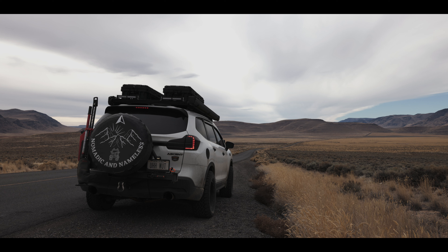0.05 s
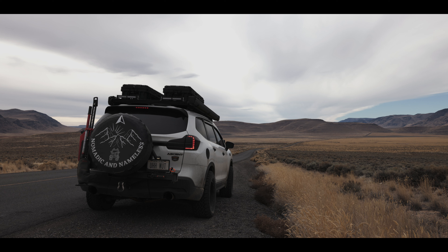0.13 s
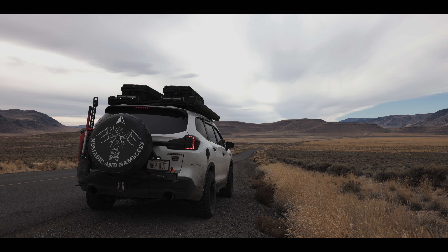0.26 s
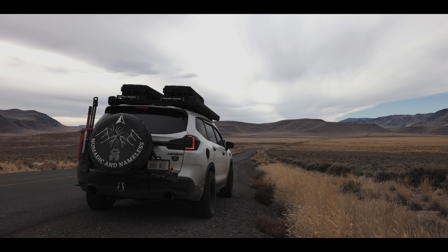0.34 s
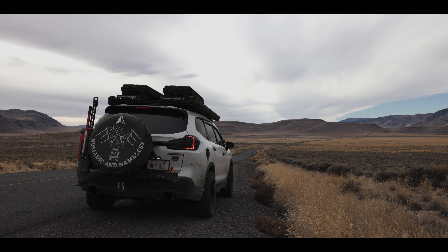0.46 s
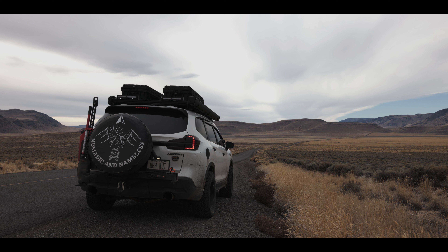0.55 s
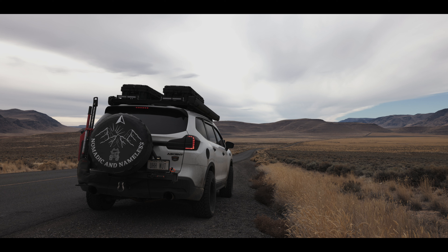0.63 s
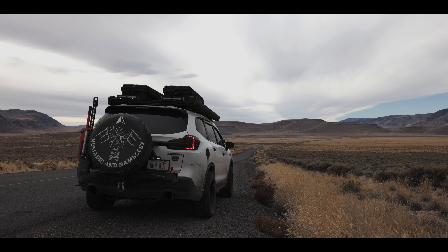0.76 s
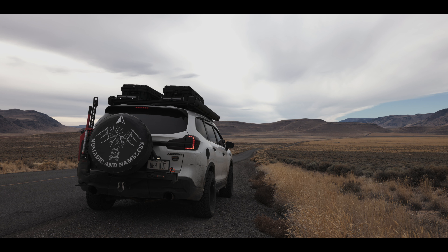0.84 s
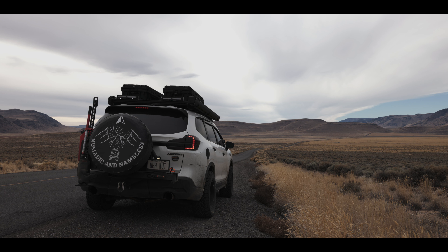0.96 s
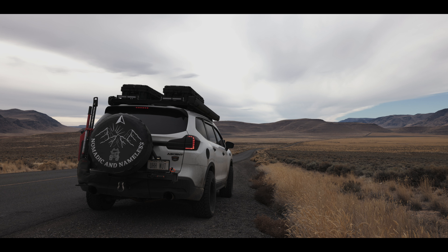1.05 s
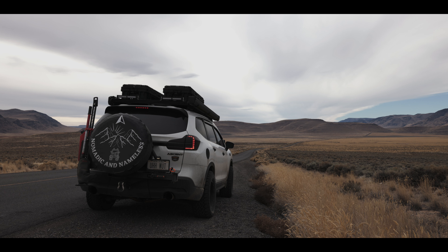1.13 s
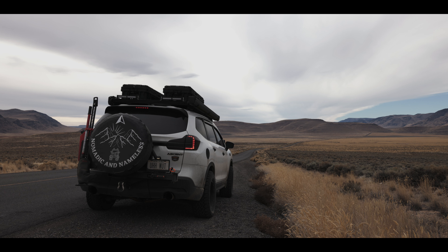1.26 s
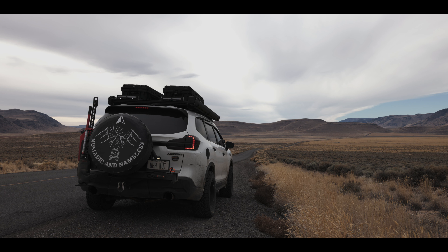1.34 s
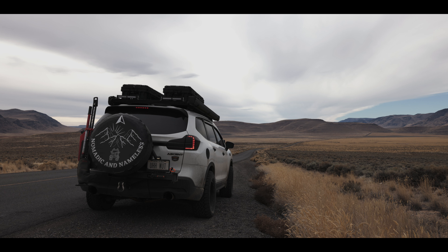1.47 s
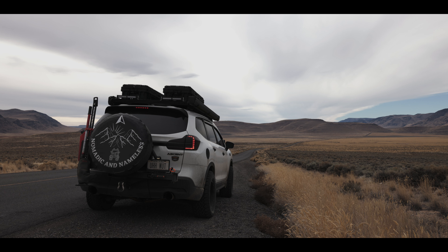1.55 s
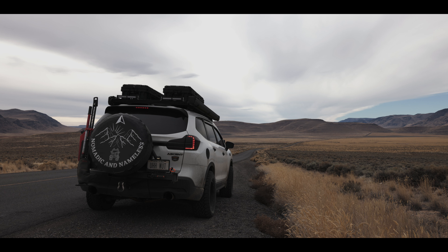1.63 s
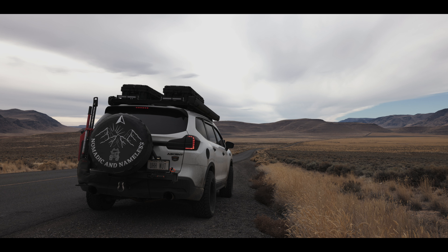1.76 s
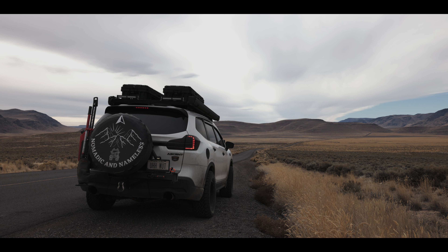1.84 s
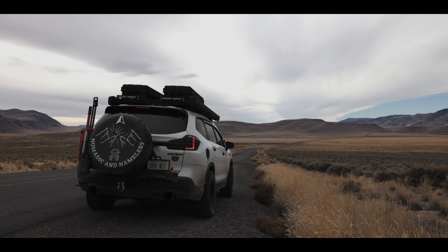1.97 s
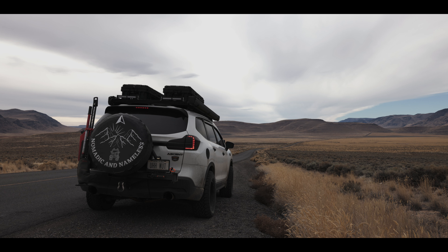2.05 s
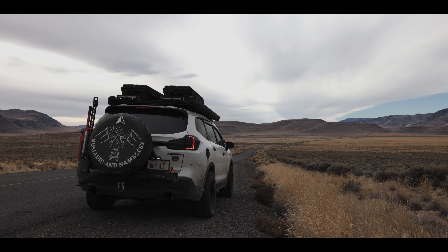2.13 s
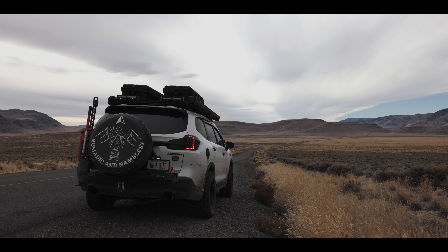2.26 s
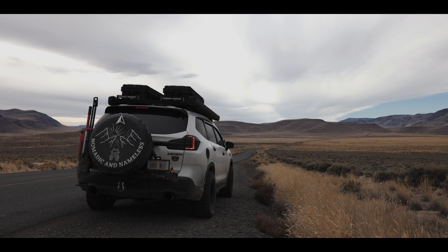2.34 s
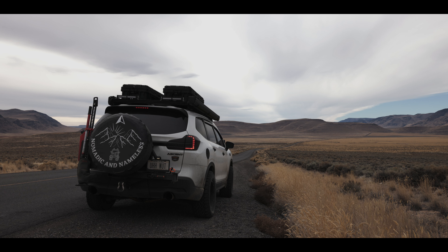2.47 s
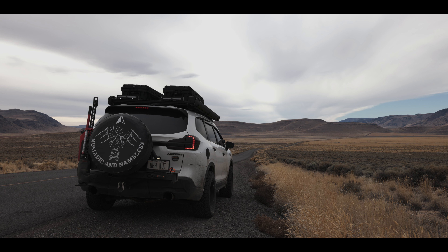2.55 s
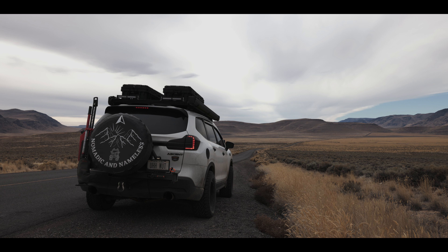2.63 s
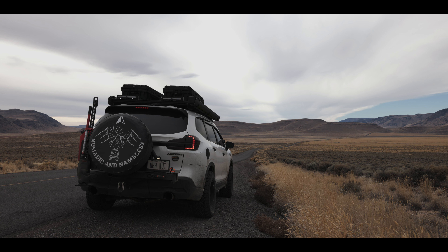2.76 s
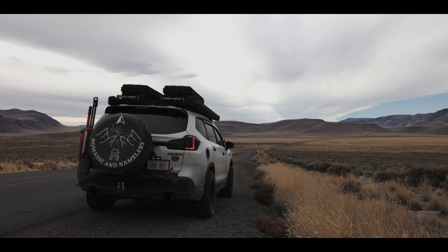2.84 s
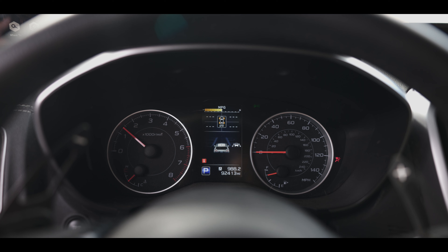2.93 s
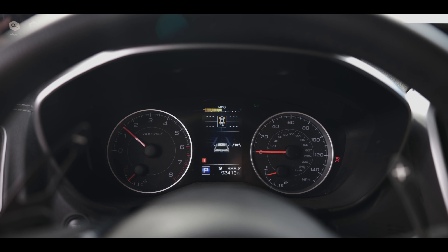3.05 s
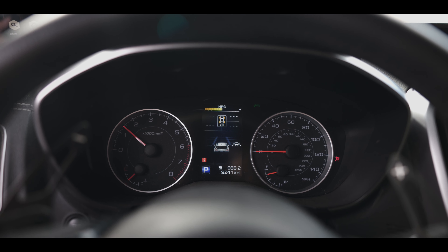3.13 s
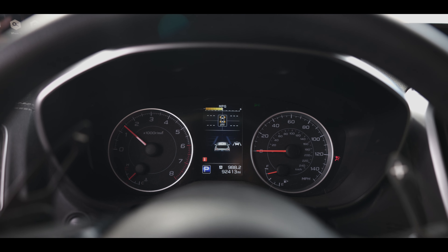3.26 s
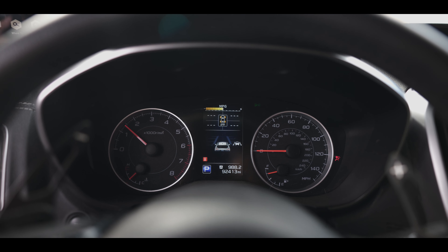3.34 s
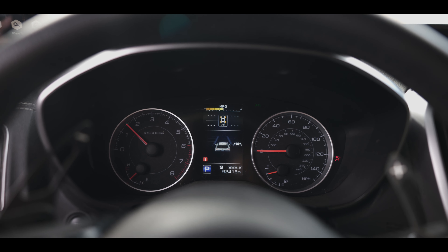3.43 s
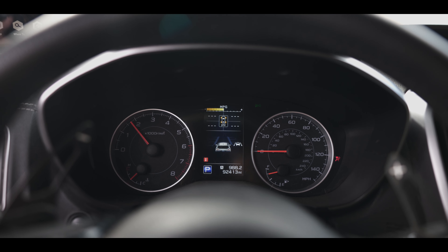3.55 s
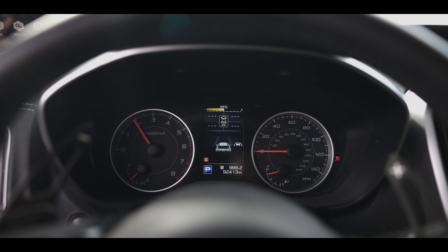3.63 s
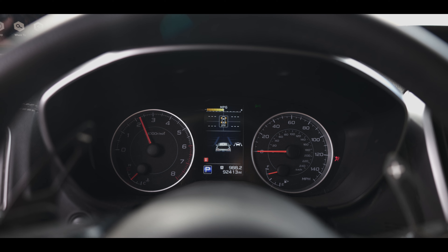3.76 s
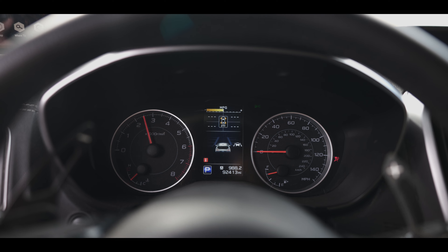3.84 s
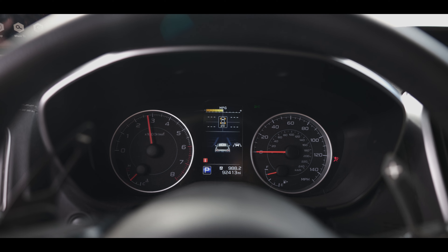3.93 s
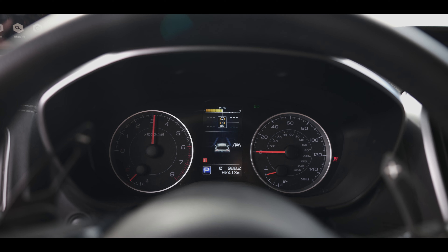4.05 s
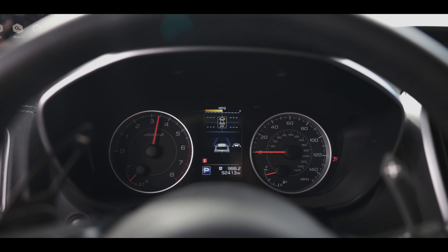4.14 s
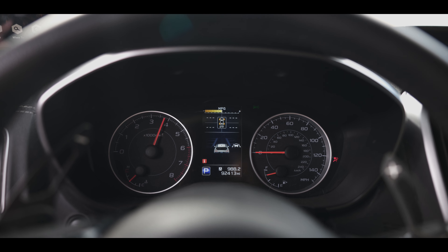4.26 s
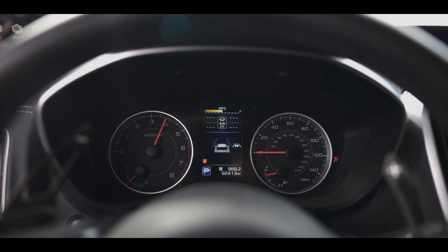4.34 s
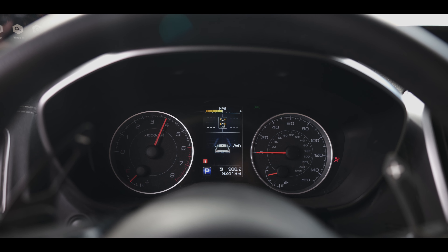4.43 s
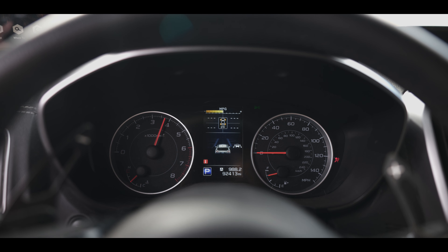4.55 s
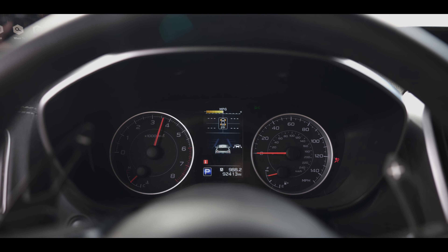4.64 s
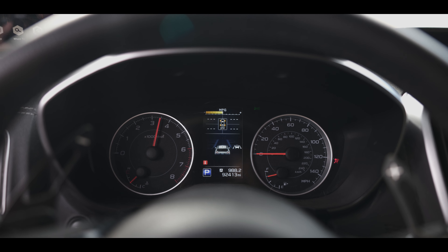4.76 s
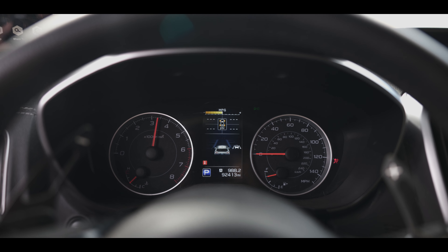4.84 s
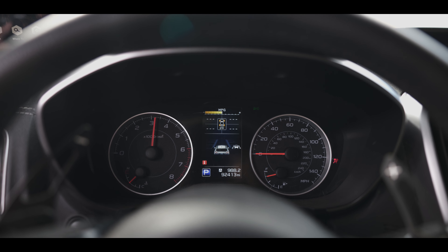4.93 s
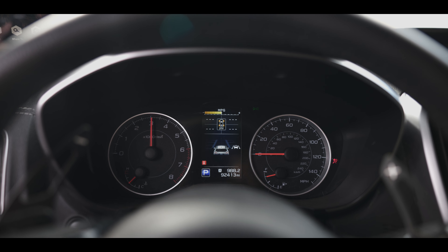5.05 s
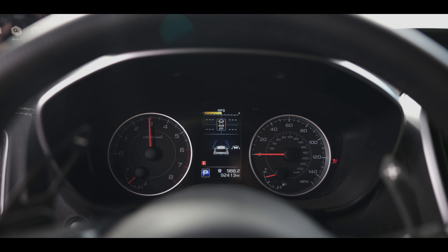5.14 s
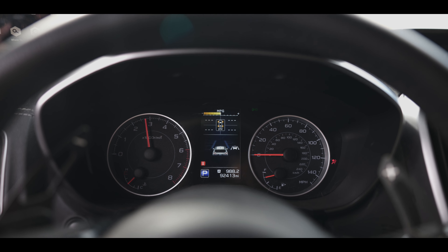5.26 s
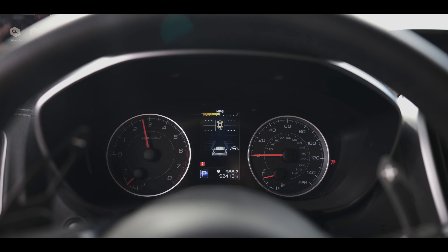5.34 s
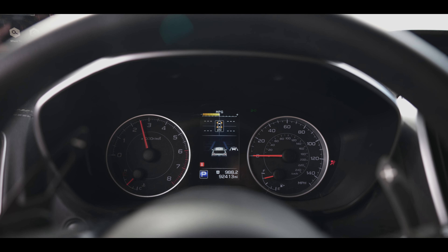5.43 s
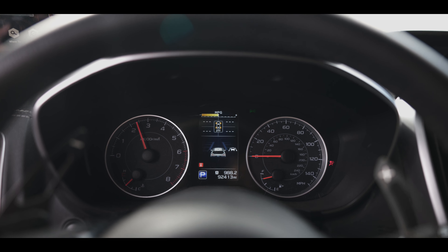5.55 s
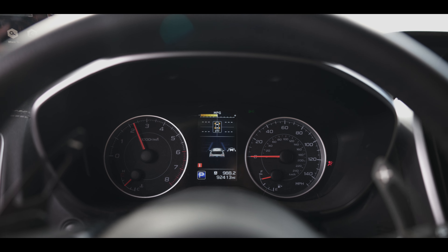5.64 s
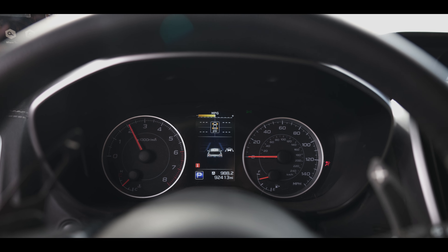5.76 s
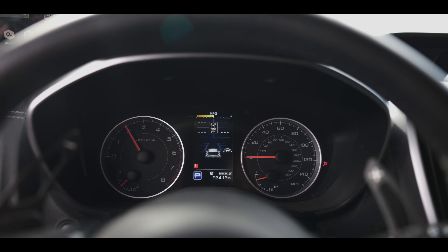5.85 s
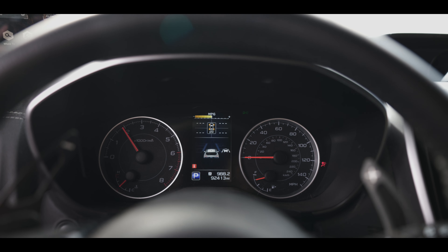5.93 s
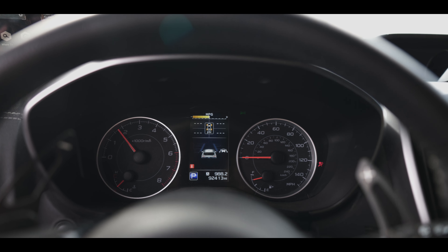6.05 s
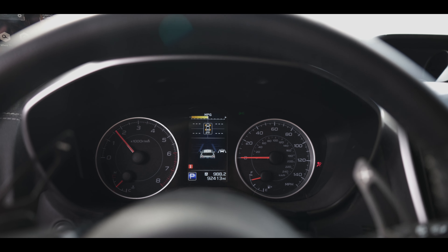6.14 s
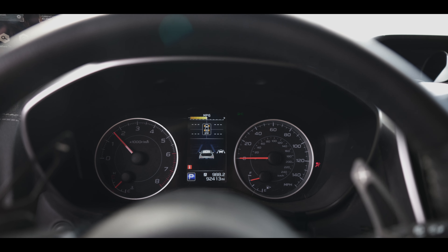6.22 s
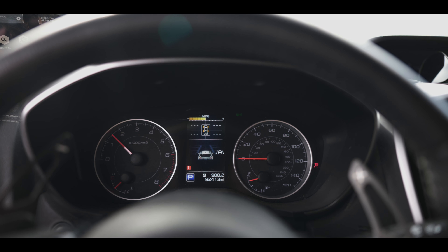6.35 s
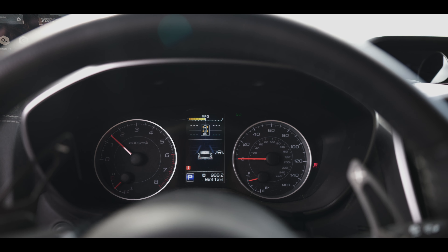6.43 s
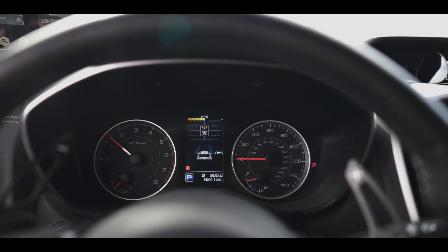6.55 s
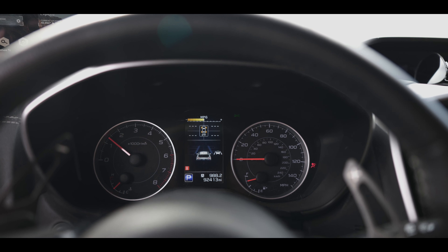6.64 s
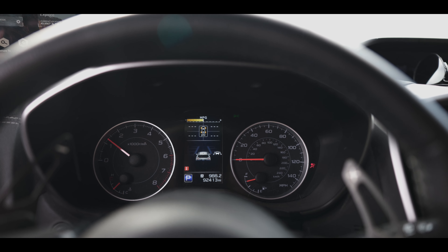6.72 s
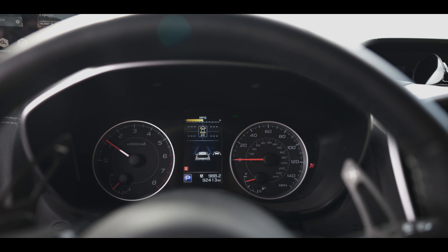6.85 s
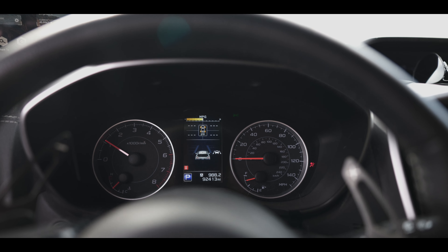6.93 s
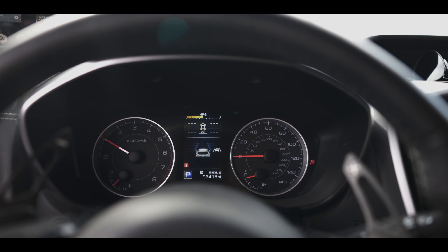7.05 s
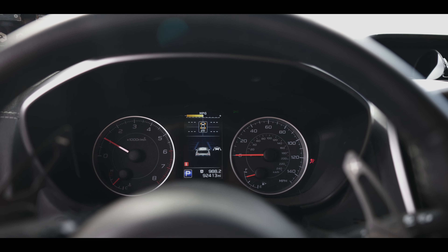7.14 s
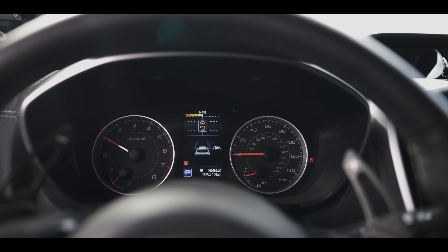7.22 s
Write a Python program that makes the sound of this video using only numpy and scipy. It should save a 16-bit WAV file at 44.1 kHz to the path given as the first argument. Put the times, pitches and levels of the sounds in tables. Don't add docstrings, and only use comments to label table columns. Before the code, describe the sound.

Close tailpipe burble of a four-cylinder idling outdoors, cutting to a muffled cabin rev that climbs, shuts off and falls with pops and knocks.

```python
import sys
import numpy as np
from scipy import signal
from scipy.fft import rfft, irfft, next_fast_len
from scipy.io import wavfile
from scipy.ndimage import uniform_filter1d

SR = 44100
rng = np.random.default_rng(int(sys.argv[2]) if len(sys.argv) > 2 else 0)


def makeup_ratio(level_db):
    decades = np.asarray(level_db, float) / 20
    return 10 ** decades


def wrap_up_sound(samples):
    columns = np.atleast_2d(samples).T
    tamed = np.clip(columns, -1, 1)
    steps = np.round(tamed * 32767).astype(np.int16)
    wavfile.write(sys.argv[1], SR, steps)


N = 321489
T = np.arange(N) / SR
CUT_S = 2.9614

# (time [s], firing rate [Hz])
CABIN_REVS = [(2.96, 47.7), (3.26, 45.8), (3.53, 62.6), (3.95, 105.2), (4.16, 128.6), (4.255, 137),
              (4.43, 127.1), (5.08, 96.7), (5.3, 86.2), (5.48, 76.5), (6.01, 57.1), (6.35, 46.4),
              (6.5, 44.9), (6.7, 40.4), (6.82, 36.7), (7.0, 32.6), (7.1, 32.6), (7.29, 37.9)]
# (time [s], load [0-1], uneven burning [dB])
DRIVER = [(2.96, 0.38, -0.5), (3.27, 0.6, 1), (3.45, 1, 12.5), (3.8, 0.92, -0.5), (4.255, 0.97, 6.5),
          (4.275, 0.3, 4), (4.55, 0, 4.5), (4.7, 0, -18.5), (5.1, 0, -4.5), (5.55, 0.1, -3),
          (5.9, 0.13, -10.5), (6.2, 0, -12), (6.5, 0, -10.5), (6.9, 0.47, -12), (7.29, 0.87, -9.5)]
# (frequency [Hz], width [Hz], level [dB])
CABIN_MODES = [(101.9, 100, 6), (162.6, 28, 17), (286, 20, 3), (329, 26, 6), (405, 42, -5),
               (480.3, 8.2, -6.5), (563.6, 42, -4.5), (704, 55, -15), (843.5, 62, -7.5)]


def columns(rows, t=T):
    s, *values = np.transpose(rows)
    return [np.interp(t, s, v) for v in values]


def evened(x):
    return x / np.sqrt(np.mean(x ** 2) + 1e-20)


def coloured(x, points):
    size = next_fast_len(len(x))
    hz, db = np.transpose(points)
    gain = makeup_ratio(np.interp(np.log(np.fft.rfftfreq(size, 1 / SR) + 1), np.log(hz), db))
    return evened(irfft(rfft(x, size) * gain, size)[:len(x)])


def slow(rate_hz):
    knots = rng.standard_normal(400)
    return np.interp(T * rate_hz, np.arange(400), knots) * np.sqrt(3 / 2)


def resonate(x, hz, width):
    turn = np.exp(2j * np.pi * np.cumsum(hz * np.ones(len(x))) / SR)
    r = np.exp(-np.pi * width / SR)
    return 2 * (turn * signal.lfilter([1 - r], [1, -r], x / turn)).real


def resonate_twice(x, hz, width):
    return resonate(resonate(x, hz, width), hz, width)


def response(modes, hz):
    return sum(makeup_ratio(db) / (1 + ((hz - f) / width * 2) ** 2) for f, width, db in modes)


def ring(modes, rise_s, count=6000):
    t = np.arange(count) / SR
    tones = sum(makeup_ratio(db - 60 * t / t60) * np.sin(2 * np.pi * hz * t) for hz, db, t60 in modes)
    return (1 - np.exp(-t / rise_s)) * tones


def burst(hz, spread_s, turn, centre_s):
    t = np.arange(3000) / SR - centre_s
    return np.exp(-.5 * (t / spread_s) ** 2) * np.sin(2 * np.pi * (hz * t + turn))


def struck(times, dbs, shape):
    train = np.zeros(N)
    at = np.clip(np.round(np.asarray(times) * SR).astype(int), 0, N - 1)
    np.add.at(train, at, makeup_ratio(dbs))
    return signal.oaconvolve(train, shape)[:N]


def puffs(times, dbs, t60, points):
    age = T[:, None] - times
    gate = (makeup_ratio(dbs - 60 * np.maximum(age, 0) / t60) * np.clip(age / 0.00077, 0, 1)).sum(1)
    grain = makeup_ratio(2.5 * evened(uniform_filter1d(rng.standard_normal(N), size=150)))
    return gate * evened(grain * coloured(rng.standard_normal(N), points))


def law(rule, hz, load):
    return rule[0] + rule[1] * np.log2(hz / 100) + rule[2] * load


def idle():
    # (time [s], firing rate [Hz])
    idle_speed = [(0, 26.83), (.6, 26.92), (1.0, 26.37), (1.2, 27.0), (1.42, 26.6), (1.68, 22.05),
                  (1.87, 21.91), (2.2, 23.33), (2.97, 22.62)]
    # (chuff [dB], after-ring [dB], rasp [dB], chuff pitch [Hz], throat [dB])
    runners = [
        (-2.5, -35.5, 2, 1550, 2.5),
        (0, -8, 5, 1550, -6.5),
        (0, -2.5, 3, 1550, -1),
        (-1, -6, -4.5, 1600, -3),
    ]
    # (frequency [Hz], level [dB], decay t60 [s])
    rasp_modes = [(196.5, -4.5, 0.064), (260, -30.5, 0.027)]
    # (frequency [Hz], level [dB], decay t60 [s])
    throat_modes = [(405.8, -9.5, 0.059), (430, -24.5, 0.0092), (516, -14.5, 0.069)]
    # (frequency [Hz], density [dB per Hz])
    open_air = [(120, -29.5), (255, 8.5), (325, -24), (400, -3), (460, -13), (535, -10.5), (610, -21.5),
                (1000, -23), (1650, -30.5), (3000, -36), (5000, -54), (8000, -68), (12000, -86.5),
                (16000, -90.5)]

    lead = 2000
    turns = np.cumsum(columns(idle_speed)[0]) / SR + 1.17
    at = np.r_[0, np.flatnonzero(np.diff(np.floor(turns))) + lead]
    at[0] = lead - .0075 * SR
    at = at[at < N]
    firing_db, push_db, chuff_db, loaded = idle_load((at - lead) / SR)
    free_lag_s, loaded_lag_s = .0011, -.0014
    t = at / SR - .022 + free_lag_s + (loaded_lag_s - free_lag_s) * loaded
    gust_db, ring_db, rasp_db, chuff_hz, throat_db = np.array(runners)[(np.arange(len(at)) - 1) % 4].T
    chance = rng.standard_normal((len(at), 4)).T
    firing_db = firing_db + 0.34 * chance[0]

    front = burst(125, .0047, .19, .0222)
    push = burst(82, .0068, -.05, .0221)
    bite = burst(150, .0013, -.25, .0188)
    kick = burst(150, .0015, -.25, .0278)
    thud = burst(38, 0.011, .1, 0.023)
    pipe = struck(t, firing_db, front)
    pipe += struck(t, firing_db + push_db, push)
    pipe += struck(t, firing_db - 7, bite)
    pipe += struck(t, firing_db + ring_db + 3.5 + chance[1], kick)
    pipe += struck(t, firing_db - 32 + 16 * loaded, thud)

    echo = t + .0258
    low_ring = -ring([(140.35, -3.5, 0.28)], 0.0023)
    mid_ring = ring([(259.5, -10.5, 0.18)], 0.0008)
    pipe += struck(echo, firing_db + ring_db + 4.5 * loaded + chance[1], low_ring)
    pipe += struck(echo + .0048, firing_db + 0.6 * ring_db + 2.5 * loaded + chance[1], mid_ring)
    pipe += struck(t + 0.02124, firing_db + rasp_db + chance[2], ring(rasp_modes, 0.0019))
    tip_db = firing_db + throat_db + loaded + 1.5 * chance[2] + 1.5
    pipe += struck(t + .0185, tip_db, ring(throat_modes, .004))

    age = np.arange(2500) / SR
    puff = (1 - np.exp(-age / 0.0025)) * makeup_ratio(-60 * age / 0.055)
    gate = struck(t + .0155, chuff_db + gust_db + 1.2 * chance[3], puff)
    pitch_hz = np.interp(np.arange(N), t * SR + lead / 2, chuff_hz * (1 + 0.008 * chance[3]))
    gas = rng.standard_normal(N)
    chuff = evened(resonate(resonate(gas, pitch_hz, 630), pitch_hz, 700))
    chuff += makeup_ratio(-14.0) * evened(resonate_twice(gas[::-1], pitch_hz, 400))
    chuff += makeup_ratio(10.0) * coloured(gas, open_air)

    out = np.r_[(pipe + gate * chuff)[lead:], np.zeros(lead)]
    out = signal.lfilter(*signal.iirnotch(324, 6.0, SR), out)
    return out + makeup_ratio(-40.5) * coloured(rng.standard_normal(N), open_air)


def idle_load(t):
    drag_s, drag_rise_s = 1.53, 0.045
    recover_s = 0.28
    loaded = np.clip((t - drag_s) / drag_rise_s, 0, 1)
    sag = loaded * np.exp(-np.maximum(t - drag_s - drag_rise_s, 0) / recover_s)
    firing_db = -17 - 2.5 * loaded - 1.5 * sag
    push_db = -2 - 3 * loaded
    chuff_db = -39.5 + 2.5 * loaded - 7.5 * sag
    return firing_db, push_db, chuff_db, loaded


def cabin_engine():
    hz = columns(CABIN_REVS)[0]
    load, uneven_db = columns(DRIVER)
    return hz, np.cumsum(hz) / SR, load, uneven_db


def exhaust():
    # (level at 100 firings/s [dB], slope [dB per octave of speed], load gain [dB])
    low_rules = [
        (2, -2, 2),
        (-18.5, 19.5, -0.5),
        (-11, 2.5, 14),
        (-21.5, 21, 12.5),
        (-14.5, 6.5, 16.5),
    ]
    # (time [s], level change [dB])
    skips = [
        (4.264, -6),
        (5.62, -1.5),
        (5.769, 4.5),
        (6.03, -8),
        (6.76, -13),
    ]

    hz, turns, load, uneven_db = cabin_engine()
    boost = boosted(hz, load)
    load_db = law((-41.5, 19.2, 18.1), hz, boost)
    dull_db = law((10.7, -3, -7.5), hz, boost)
    scatter = .12

    low_orders = (1, 1.5, 2, 2.5, 3)
    low = []
    for k, rule in zip(low_orders, low_rules):
        waver_db = slow(21) + (k == 1.5) * 0.47 * uneven_db
        low.append(low_order(k, rule, hz, load) * makeup_ratio(waver_db))
    out = np.zeros(N)
    for k, size in zip(low_orders, low):
        out += size * np.cos(2 * np.pi * (k * turns + scatter * rng.standard_normal()))
    out += makeup_ratio(-35.0 + 3.1 * slow(7.6)) * low[0] * np.sin(np.pi * turns)
    out *= makeup_ratio(sum(db * np.exp(-.5 * ((T - s) / 0.016) ** 2) for s, db in skips))

    for k in range(7, 30):
        order = k / 2
        waver_db = (2.5 if k % 2 == 0 else 4.5) * slow(13)
        db = load_db - dull_db * np.log2(order * hz / 300) + waver_db - 7 * (k % 2)
        stray = scatter * (rng.standard_normal() + .5 * slow(9))
        out += makeup_ratio(db) * response(CABIN_MODES, order * hz) * np.cos(2 * np.pi * (order * turns + stray))
    return out


def low_order(k, rule, hz, load):
    # (frequency [Hz], width [Hz], loaded level [dB], change when shut [dB])
    floor_modes = [(79, 88, -30.5, -2.5), (115.5, 41, -28, -2), (147.9, 2.1, -29.5, 2.5),
                   (165.2, 27.3, -22.5, 11), (179.5, 12.4, -12.5, -10), (199.1, 16, -17, -8.5),
                   (250, 17, -31.5, -9), (279, 24, -29.5, 4.5), (329, 15, -27.5, -6), (402, 4.5, -25.5, -7)]
    f = k * hz
    modes = [(mode_hz, width, db + shut_db * (1 - load)) for mode_hz, width, db, shut_db in floor_modes]
    null = 1 - .8 / (1 + ((f - 216.5) / 18 * 2) ** 2)
    bass_cut = 1 + (52.6 / f) ** 5.3
    return np.sqrt(2) * makeup_ratio(law(rule, hz, load)) * response(modes, f) * null / bass_cut


def boosted(hz, load):
    return load * (1 - 0.15 / (1 + np.exp((hz - 97) / 5.5)))


def overrun():
    # (frequency [Hz], width [Hz], level [dB])
    coast_modes = [(287, 53, -45), (365, 40, -44.5), (408, 34, -45)]
    hz, turns, load, _ = cabin_engine()
    shut = (T > DRIVER[5][0]) * (1 - load)
    out = np.zeros(N)
    for k in (3, 4, 5, 6):
        out += response(coast_modes, k * hz) * makeup_ratio(1.5 * slow(8)) * np.cos(2 * np.pi * k * turns)
    return shut * out


def pops():
    # (time [s], boom [dB], crack [dB])
    fuel_pops = [
        (4.249, -19, -56.5),
        (5.599, -27, -67.5),
        (5.658, -38, -57),
        (5.771, -14, -16),
        (5.822, -18, -40),
        (6.936, -32.5, -59),
        (7.173, -38.5, -65),
    ]
    # (frequency [Hz], level [dB], decay t60 [s])
    crack_modes = [(479, -13, .16), (582, -3, .06), (678, -10, .1), (790, 0, .025), (805, -13, .09),
                   (870, -1, .025), (1001, -8, .02), (1190, -10, .02), (1405, -8, .03), (1620, -10, .02),
                   (1900, -9, .02), (2476, -22, .03), (2918, -26, .03)]
    s, boom_db, crack_db = np.transpose(fuel_pops)
    boom_modes = [(169.3, 6.0, 0.34), (116.0, 7.5, 0.056), (56.4, -17.0, 0.017), (311, -8.0, 0.099)]
    boom = ring(boom_modes, 0.0028, count=9000)
    return struck(s + 0.01, boom_db, boom) + struck(s, crack_db, ring(crack_modes, 0.0028))


def swells():
    # (start [s], length [s], frequency [Hz], level [dB])
    air_swells = [(5.566, 0.061, 170, -26.5), (5.865, 0.2, 178, -18), (6.082, .05, 177.3, -25),
                  (6.143, 0.056, 163.8, -28), (6.248, 0.031, 165.4, -29.5), (6.511, 0.07, 178, -35),
                  (6.621, 0.063, 176, -30.5), (6.667, 0.063, 160.8, -29.5), (6.787, 0.13, 179.6, -33),
                  (6.931, 0.06, 172, -25), (7.037, 0.11, 168, -25), (7.165, .065, 174, -22),
                  (7.245, 0.092, 178.9, -24)]
    throb = 1 + .2 * np.cos(2 * np.pi * cabin_engine()[1])
    out = np.zeros(N)
    for s, length, hz, db in air_swells:
        arch = np.sqrt(np.sin(np.pi * np.clip((T - s) / length, 0, 1)) + 1e-9) ** 0.83
        out += makeup_ratio(db) * arch * np.sin(2 * np.pi * hz * T)
    shake = resonate_twice(rng.standard_normal(N), 65, 110)
    return throb * out + makeup_ratio(-45) * evened(shake)


def cabin_noise():
    # (frequency [Hz], density [dB per Hz])
    bay_air = [(120, -33), (270, 6), (370, 3.5), (520, -5.5), (1000, -12), (1720, -16.5), (2480, -26),
               (4000, -39), (6300, -55), (9000, -60), (12000, -90), (16000, -95)]
    # (multiple of the firing rate, level over the hiss [dB])
    whine_orders = [(14.9, -2), (19.8, -6), (24.7, -8), (29.6, -7), (34.6, -7)]
    # (frequency [Hz], width [Hz], level [dB])
    housing_modes = [(1100, 70, -2), (1245, 55, 5), (1440, 70, 1), (1670, 70, 2), (1790, 55, 1),
                     (2750, 300, -21)]

    hz, turns, load, uneven_db = cabin_engine()
    boom_db = law((-39, -1.5, .1), hz, load) + uneven_db
    rumble_db = law((-59, 14, 3.5), hz, boosted(hz, load)) + 1.5 * uneven_db
    hiss_db = law((-52, 9, 3.4), hz, load)
    noise = rng.standard_normal((3, N))
    boom = evened(resonate_twice(noise[0], 176, 21))
    rumble = evened(sum(makeup_ratio(db) * resonate_twice(noise[1], f, 21.0 * w) for f, w, db in CABIN_MODES[2:]))
    throb = 1 + 0.037 * np.cos(2 * np.pi * turns)
    hiss = makeup_ratio(12.5 + 0.5 * slow(25)) * throb * coloured(noise[2], bay_air)
    whine = np.zeros(N)
    for k, db in whine_orders:
        size = makeup_ratio(db + 4.0 + 2.9 * slow(9.5)) * response(housing_modes, k * hz)
        whine += size * np.sin(2 * np.pi * k * turns)
    whine *= np.interp(T, [4.2, 4.5], [.25, 1])
    return makeup_ratio(boom_db) * boom + makeup_ratio(rumble_db) * rumble + makeup_ratio(hiss_db) * (hiss + whine)


def clunks():
    # (time [s], ring [dB], rattle [dB], rattle decay t60 [s])
    bounces = [
        (0.672, -41, -36.5, 0.2),
        (0.689, -72, -43.5, 0.44),
        (0.72, -63, -36, 0.24),
        (0.769, -74, -57, 0.17),
        (.795, -76, -46, 0.29),
    ]
    # (frequency [Hz], level [dB], decay t60 [s])
    clutch_modes = [(1400, -16, .1), (2900, -6, .05), (3400, -9, .05), (5100, -2, .03), (5450, -3, .1),
                    (5787, -9, .06), (6266, -9, .05), (7709, -4, .07), (10800, -10, .04)]
    # (frequency [Hz], density [dB per Hz])
    rattle_colour = [(500, 2.5), (900, -6), (1400, -9.5), (2100, -10), (3500, -19), (5500, -32.5),
                     (8000, -35), (12000, -47.5), (16000, -52)]
    # (time [s], level [dB], decay t60 [s])
    trim_knocks = [
        (3.008, -50, 0.063),
        (3.22, -39, 0.062),
        (5.057, -36.5, 0.041),
        (5.771, -52.5, 0.062),
        (5.783, -37, 0.077),
        (6.9, -43.5, 0.12),
        (7.283, -41, 0.046),
    ]
    # (frequency [Hz], density [dB per Hz])
    knock_colour = [(150, -28), (400, 11.5), (1000, 5.5), (2200, -3.5), (3000, -11), (5000, -33),
                    (9000, -46), (16000, -72)]
    s, ring_db, rattle_db, t60 = np.transpose(bounces)
    plate = struck(s, ring_db, ring(clutch_modes, 0.00027)) + puffs(s, rattle_db, t60, rattle_colour)
    return plate + puffs(*np.transpose(trim_knocks), knock_colour)


def rings():
    # (time [s], level [dB])
    plate_hits = [
        (.726, -36),
    ]
    # (frequency [Hz], level [dB], decay t60 [s])
    plate_modes = [(1390, 0, .17), (1770, -11, .06), (2340, -9, .1), (2840, -6, .04), (3500, -9, .03),
                   (4590, -15, .03)]
    # (time [s], level [dB])
    late_hits = [
        (.797, -48),
    ]
    # (frequency [Hz], level [dB], decay t60 [s])
    late_modes = [(1440, -2, .1), (2360, 0, .15), (3250, -8, .05)]
    # (time [s], level [dB], decay t60 [s])
    spits = [
        (.669, -46, .09),
        (.702, -58, .08),
        (7.284, -43, .04),
    ]
    # (frequency [Hz], density [dB per Hz])
    spit_colour = [(1500, -11.5), (3000, -9), (5300, 3), (6800, -6.5), (8000, -2), (11000, -14),
                   (16000, -24)]
    # (time [s], level [dB])
    clip_hits = [
        (3.222, -43),
    ]
    # (frequency [Hz], level [dB], decay t60 [s])
    clip_modes = [(1250, -4, .015), (1650, -3, .015), (2080, -1, .03), (2420, 0, .035), (2800, -4, .015),
                  (3150, -5, .02), (3700, -9, .012)]
    out = struck(*np.transpose(plate_hits), ring(plate_modes, 0.0019, count=9000))
    out += struck(*np.transpose(late_hits), ring(late_modes, 0.0039, count=9000))
    out += puffs(*np.transpose(spits), spit_colour)
    return out + struck(*np.transpose(clip_hits), ring(clip_modes, 0.00021))


def chatter():
    # (time [s], frequency [Hz], level [dB], decay t60 [s])
    loose_parts = [(.678, 2900, -38, .04), (.692, 3400, -47, 0.035), (.695, 1650, -35, .06),
                   (.705, 5900, -46, .03), (.722, 3500, -43, .04), (.731, 2880, -42, 0.033),
                   (.734, 2070, -45, .04), (.748, 2330, -45, .06), (.757, 2180, -45, 0.056),
                   (.772, 1650, -44, 0.044), (.795, 5800, -58, 0.031), (.808, 1710, -38, 0.048),
                   (.846, 1670, -45, .06)]
    # (time [s], frequency [Hz], level [dB], decay t60 [s])
    cabin_trim = [(5.2, 680, -36, 0.078), (3.8, 310, -35.5, 0.13), (6.3, 450, -40.5, 0.17),
                  (5.9, 550, -38.5, 0.097), (5.785, 830, -36.5, 0.14), (6.3, 690, -45, .12),
                  (11, 415, -29, 0.07), (6.895, 380, -35, 0.055), (5.4, 250, -23, .06)]
    out = np.zeros(N)
    for s, hz, db, t60 in loose_parts + cabin_trim:
        rise_s = 1.2 * np.sqrt(3 / hz) / 20
        out += struck([s], [db], ring([(hz, 0, t60)], rise_s, count=5000))
    return out


def lens():
    # (start [s], steps, peak [dB])
    motor_runs = [
        (3.1061, 1, -49),
        (3.1894, 1, -47),
        (3.2313, 7, -50),
        (3.5655, 3, -50),
        (6.6516, 4, -48),
        (6.8601, 4, -49),
    ]
    # (time [s], peak [dB])
    stray_steps = [(3.0282, -52), (3.0831, -53), (3.2991, -58), (3.4288, -54), (3.5531, -57), (3.6324, -54),
                   (3.6992, -55), (6.5733, -53), (6.9659, -52), (7.0048, -58)]
    # (frequency [Hz], level [dB], decay t60 [s])
    barrel_modes = [(2020, -1, .012), (3300, -5, .005), (4300, -4, .005), (5200, -3, .005),
                    (6140, -2, .007), (7300, -7, .004), (8000, -6, .004), (9300, -8, .004),
                    (10800, -13, .003)]
    step_s = .0417
    steps = [(start + step_s * i, db) for start, count, db in motor_runs for i in range(count)]
    s, db = np.transpose(steps + stray_steps)
    db = db + .8 * rng.standard_normal(len(db))
    tick = ring(barrel_modes, 0.00017, count=800)
    light = ring(barrel_modes[3:], .0001, count=200) * np.hanning(400)[200:]
    return struck(s - .0005, db + 6.5, tick) + struck(s - .0085, db - 4.0, light)


def bird():
    # (time [s], pitch [Hz], level [dB])
    whistle = [
        (1.62, 5500, -95),
        (1.635, 5200, -69),
        (1.665, 4400, -69),
        (1.68, 4000, -95),
    ]
    hz, db = columns(whistle)
    sounding = (T > whistle[0][0]) * (T < whistle[-1][0])
    return makeup_ratio(db) * sounding * np.sin(2 * np.pi * np.cumsum(hz) / SR)


def vent():
    return makeup_ratio(-49) * evened(resonate_twice(rng.standard_normal(N), 366, 30))


def scene():
    inside = np.clip((T - CUT_S) / .003 + .5, 0, 1)
    cabin = exhaust() + overrun() + pops() + swells() + cabin_noise() + vent()
    mix = inside * cabin + (1 - inside) * idle()
    mix += clunks() + rings() + chatter() + lens() + bird()
    mix -= makeup_ratio(-14.5 - 60 * T / .02)
    mix *= 1 - makeup_ratio(-60 * T[::-1] / .008)
    mix -= makeup_ratio(-12 - 60 * T[::-1] / .006)
    return (mix + struck([CUT_S], [-29], makeup_ratio(-60 * T[:400] / 0.0095)))[None]


def roll_off(x):
    return signal.sosfilt(signal.butter(12, 15800, fs=SR, output="sos"), x)


def record(dry):
    # (frequency [Hz], density [dB per Hz])
    mic_noise = [(1000, -3.5), (3000, -1.5), (6000, -6.5), (9000, -15), (12000, -21), (16000, -37)]
    x = dry + makeup_ratio(-69.5) * coloured(rng.standard_normal(N), mic_noise)
    x = signal.sosfilt(signal.butter(2, 35, "high", fs=SR, output="sos"), x)
    x = signal.lfilter(*signal.iirnotch(6950, 18, SR), x)
    power_db = 10 * np.log10(abs(uniform_filter1d(x ** 2, 2000)) + 1e-12)
    top = signal.sosfiltfilt(signal.butter(8, 4900, "high", fs=SR, output="sos"), x)
    x = x - top * np.clip(power_db + 15.5, 0, 1)
    return roll_off(x)


dry = scene()
out = record(dry)
wrap_up_sound(out)
```